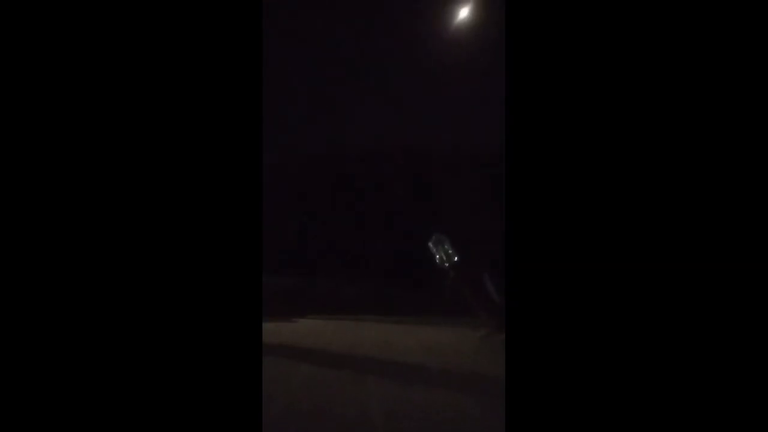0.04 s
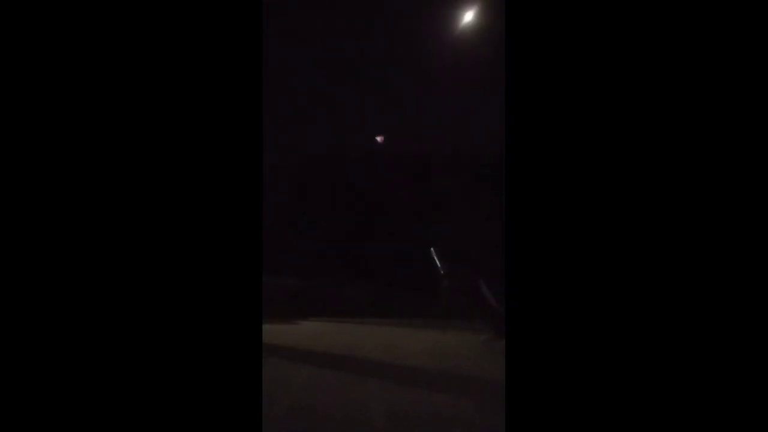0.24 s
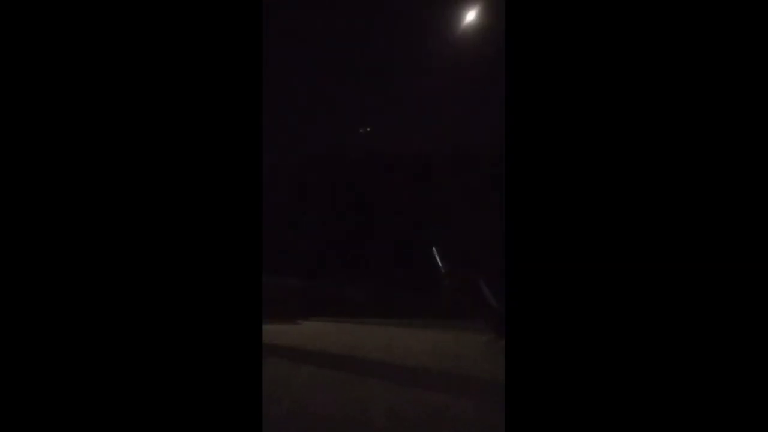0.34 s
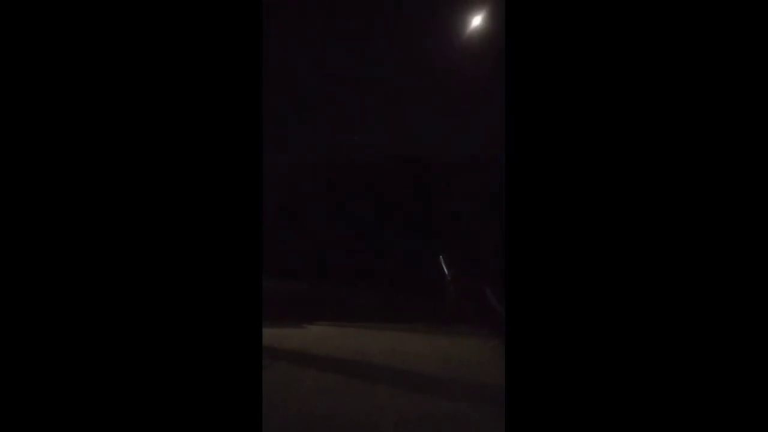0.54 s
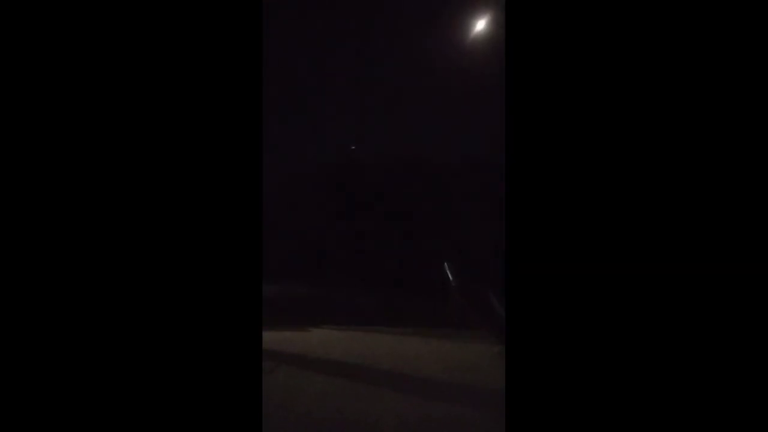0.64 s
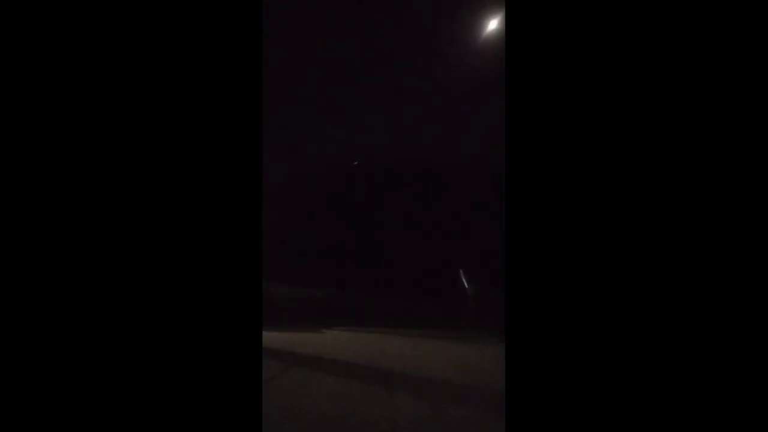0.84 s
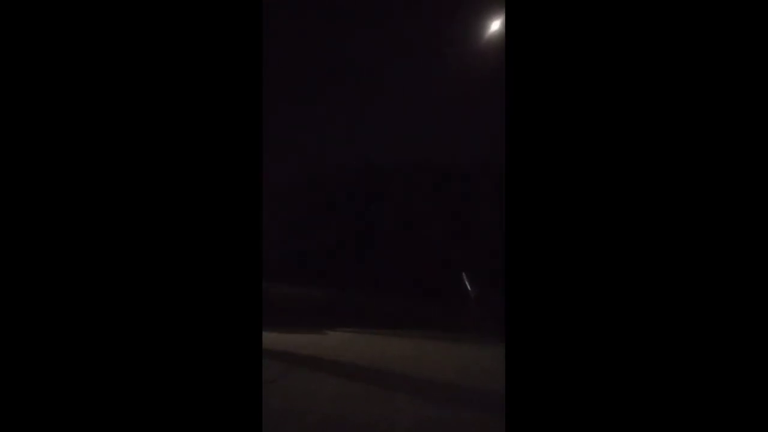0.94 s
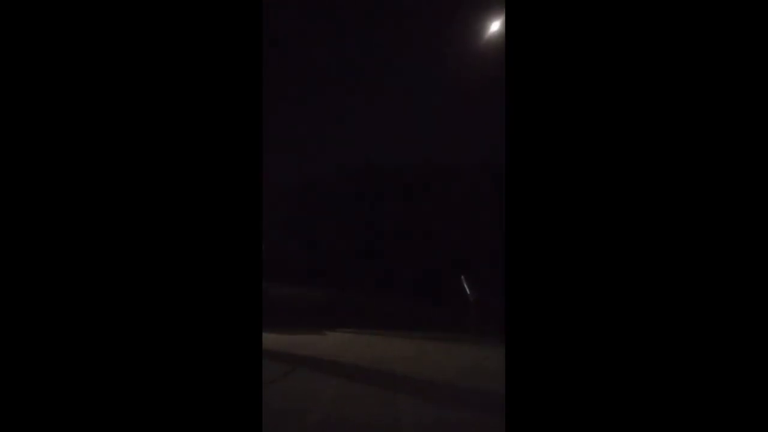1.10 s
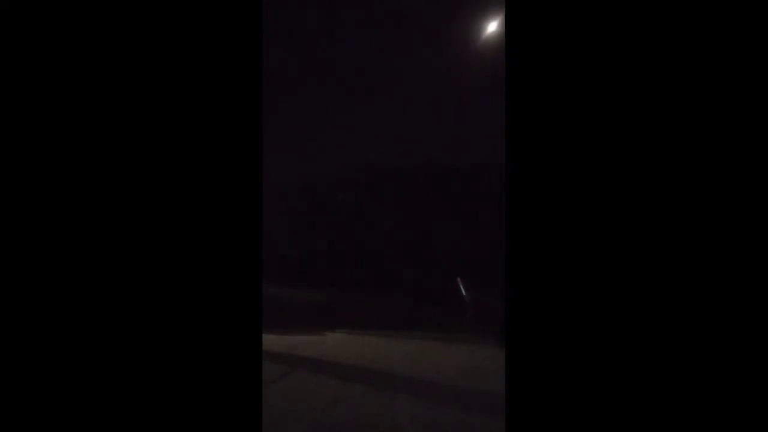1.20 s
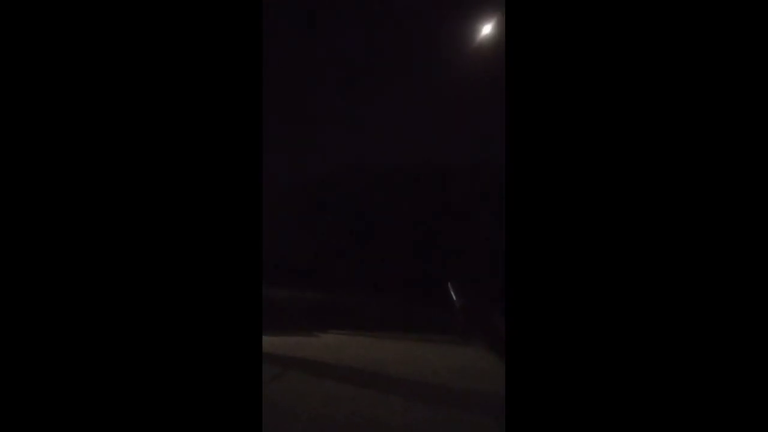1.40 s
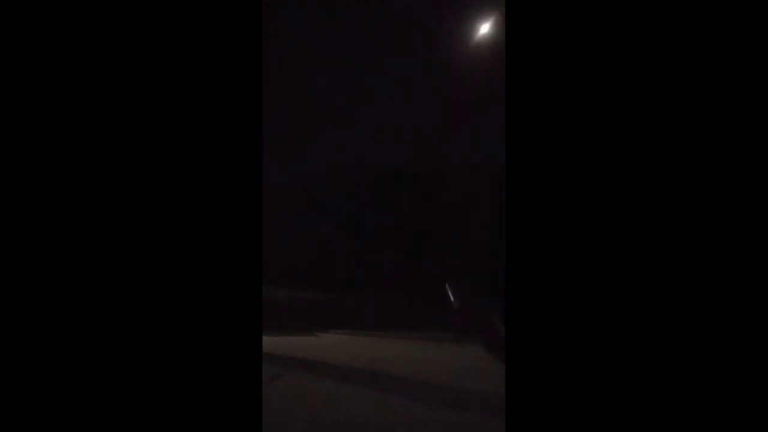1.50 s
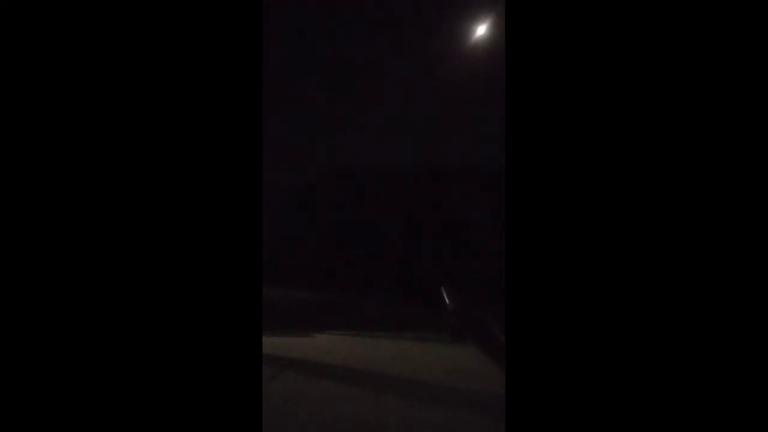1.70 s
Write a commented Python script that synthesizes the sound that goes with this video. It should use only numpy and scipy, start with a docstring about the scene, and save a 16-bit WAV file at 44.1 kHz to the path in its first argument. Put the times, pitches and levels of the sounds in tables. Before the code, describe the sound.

A sharp hollow bang bursts from a plastic bottle outdoors at night, echoing over faint crickets

```python
"""A boom of a few low damped swings overloads the microphone as vapour ignites in a plastic bottle.
A hollow pop of ringing modes and a crack comes first, then a fizz and spurts of filtered noise, the jet.
Smeared noise slaps with a body tone come back from the yard; a banded noise tail rushes away.
Pulsed-tone crickets trill through the night, a bush cricket ticks in falling whistles,
and coloured noise makes the far chorus, the faint hiss and the low rumble."""
import sys
import numpy as np
from scipy import signal
from scipy.fft import rfft, irfft
from scipy.io import wavfile

SR = 44100
rng = np.random.default_rng(int(sys.argv[2]) if len(sys.argv) > 2 else 0)


def dump(signal):
    """Clip the signal to [-1, 1] and save it as 16-bit WAV at the path in sys.argv[1]."""
    limited = np.clip(np.atleast_2d(signal).T, -1, 1)
    pcm = np.round(limited * 32767).astype(np.int16)
    wavfile.write(sys.argv[1], SR, pcm)


N = 77175
T = np.arange(N) / SR
POP_S, BANG_S = 0.2336, 0.279


def from_db(db):
    """Decibels to gain."""
    return 10 ** (np.asarray(db) / 20)


def rms_one(x):
    """Scale to unit rms."""
    return x / np.sqrt(np.mean(x ** 2) + 1e-20)


def at_hz(points, hz):
    """Read a table on a log-frequency axis."""
    table_hz, values = np.transpose(points)
    return np.interp(np.log(np.maximum(hz, 1)), np.log(table_hz), values)


def noise(spectrum):
    """Gaussian noise of a given colour, unit rms."""
    gain = from_db(at_hz(spectrum, np.fft.rfftfreq(N, 1 / SR)))
    return rms_one(irfft(rfft(rng.standard_normal(N)) * gain, N))


def drift(rate_hz):
    """Random wander of unit rms: two-pole low-passed noise, made at SR / 40 and interpolated."""
    step = 40
    pole = np.exp(-2 * np.pi * rate_hz * step / SR)
    white = rng.standard_normal(N // step + 2002)
    slow = signal.lfilter([1], [1, -2 * pole, pole * pole], white)[2000:]   # drop the settling
    return np.interp(np.arange(N) / step, np.arange(len(slow)), rms_one(slow))


def burst(start_s, rise_s, t60_s, hold_s=0):
    """Envelope: sine-squared attack, hold, exponential decay."""
    t = np.maximum(T - start_s, 0)
    attack = np.sin(np.pi / 2 * np.minimum(t / rise_s, 1)) ** 2
    decay = np.exp(-np.log(1000) * np.maximum(t - rise_s - hold_s, 0) / t60_s)
    return attack * decay


def band(x, low_hz, high_hz, order=1):
    """Causal Butterworth band-pass."""
    edges_hz = [low_hz, min(high_hz, SR / 2 - 100)]
    sos = signal.butter(order, edges_hz, "band", fs=SR, output="sos")
    return signal.sosfilt(sos, x + 1e-18)


def night_air():
    """Steady coloured-noise hiss, plus a low noise rumble that comes and goes."""
    # Each row: frequency in Hz, relative density in dB per Hz.
    hiss_spectrum = [(25, -28), (60, -13.5), (110, -7), (180, -12.5), (330, -17), (760, -22.5), (1500, -30),
                     (4200, -38), (9000, -42), (16000, -50)]
    rumble_spectrum = [(20, -44), (45, -15), (70, 1.5), (120, -1.5), (200, -18.5), (600, -54)]
    # Each row: time in seconds, rumble level in dB.
    rumble_level = [(0, -67.5), (.09, -63.5), (.15, -76.5), (.75, -81.5), (.82, -68.5), (.97, -77),
                    (1.04, -67.5), (1.12, -77), (1.22, -71.5), (1.3, -69.5), (1.42, -82), (1.51, -79),
                    (1.57, -67), (1.68, -77.5), (1.75, -72)]
    hiss_db = -77
    rumble_db = np.interp(T, *np.transpose(rumble_level))
    return from_db(hiss_db) * noise(hiss_spectrum) + from_db(rumble_db) * noise(rumble_spectrum)


def crickets():
    """Near-pure wing tones, pulsed by the strokes and wavering, over a noise chorus of far insects."""
    # Each row: mean tone in Hz, level in dB before the swell, mean pulses per second.
    singers = [(5392, -73.5, 43), (5445, -79.5, 49), (5350, -79.5, 37)]
    # Trill swell, early then late. Each row: time in seconds, level in dB (the mean is removed below).
    swell_early = [(0, -72), (.05, -72), (.16, -76.5), (.22, -67.5), (.27, -77.5), (.72, -79)]
    swell_late = [(0.76, -77.5), (0.896, -72), (0.954, -75.5), (0.976, -73), (1.078, -72.5), (1.18, -79),
                  (1.332, -76.5), (1.416, -75), (1.448, -70.5), (1.576, -72.5), (1.592, -79.5), (1.75, -70)]
    # Each row: frequency in Hz, relative density in dB per Hz.
    chorus_spectrum = [(4000, -43.5), (4950, -26), (5200, -4.5), (5400, 4), (5600, -8.5), (5950, -13.5),
                       (6500, 0.5), (7200, -1), (8000, -8.5), (8700, -19.5), (10000, -26), (16000, -52.5)]
    chorus_db, chorus_drift_db = -75.5, 0.61
    swell_s, swell_db = np.transpose(list(swell_early) + list(swell_late))
    swell = from_db(np.interp(T, swell_s, swell_db - swell_db.mean()))
    trill = 0
    for hz, level_db, pulses_per_s in singers:
        strokes = np.cumsum(pulses_per_s * (1 + 0.13 * drift(4))) / SR
        pulse = 1 + 0.68 * np.sin(2 * np.pi * strokes)
        tone = np.sin(2 * np.pi * np.cumsum(hz + 25 * drift(60)) / SR)
        trill = trill + from_db(level_db + 2 * drift(13)) * rms_one(pulse * tone)
    chorus = from_db(chorus_db + chorus_drift_db * drift(15)) * noise(chorus_spectrum)
    return swell * trill + chorus


def bush_cricket():
    """Each wing stroke is a short, slightly rough falling whistle; fainter ones answer at random."""
    # Each row: start in seconds, peak level in dB, starting pitch in Hz before the waver.
    near_ticks = [(1.010, -74, 8200), (1.100, -74, 8300), (1.188, -71, 8200), (1.270, -74, 8300),
                  (1.356, -68, 7300), (1.395, -63, 7300), (1.437, -65, 7300), (1.472, -74, 8400),
                  (1.568, -72, 8200), (1.603, -72, 7700), (1.648, -74, 8400)]
    tick_s, fall_hz, waver_hz = 0.0171, 992.6, 120
    far_per_s, far_db = 40, -77
    far_ticks = [(u * N / SR, far_db, 7200 + 1200 * v)
                 for u, v in rng.random((int(far_per_s * N / SR), 2))]
    out = np.zeros(N + SR)   # room for ticks that overrun the end
    waver = np.pad(waver_hz * drift(199.6), (0, SR))
    progress = np.linspace(0, 1, int(tick_s * SR))
    for start_s, db, hz in list(near_ticks) + far_ticks:
        first = int(start_s * SR)
        span = slice(first, first + len(progress))
        turns = np.cumsum(hz - fall_hz * progress + waver[span]) / SR
        out[span] += from_db(db) * np.sin(np.pi * progress) * np.sin(2 * np.pi * turns)
    return out[:N]


def tail():
    """Weak scatter from the ground nearby, then a fluttering rush from the trees, dying band by band."""
    # Each row: frequency in Hz, relative density in dB per Hz.
    tail_spectrum = [(40, -24.5), (90, -9.5), (215, -2.5), (400, 0), (520, -7.5), (640, -0.5), (880, -12.5),
                     (1430, -12.5), (1900, -10.5), (2300, -19), (2750, -9), (3800, -16), (6400, -18),
                     (8500, -25.5), (11000, -38.5), (16000, -45)]
    # Each row: frequency in Hz, t60 in seconds.
    t60_table = [(80, 0.92), (250, 0.86), (650, 1), (1500, 1.0), (3500, 1), (6500, 0.92), (12000, 0.58)]
    level_db, flutter_db = -40.5, 1.8
    near_rel_db, near_tilt_db_per_octave, near_rise_s, near_t60_s = -7.5, -0.5, 0.091, 0.16
    far_full_s, far_rise_s = 0.4004, 0.017
    path_gain, path_spread_s = 0.33, 0.021   # four extra paths comb the colour
    freqs_hz = np.fft.rfftfreq(N, 1 / SR)
    paths = sum(np.exp(-2j * np.pi * freqs_hz * lag_s) for lag_s in path_spread_s * rng.random(size=4))
    combed = rfft(noise(tail_spectrum)) * (1 + path_gain * paths)
    combed = combed / np.sqrt(1 + (2 * path_gain) ** 2)   # keep the expected power
    octave = np.log2(np.maximum(freqs_hz, 1))
    out = 0
    for hz in 2.0 ** np.arange(5, 15):   # overlapping triangular octave bands
        part = irfft(combed * np.maximum(1 - abs(octave - np.log2(hz)), 0), N)
        near_db = near_rel_db + near_tilt_db_per_octave * np.log2(hz / 1000)
        near = from_db(near_db) * burst(BANG_S, near_rise_s, near_t60_s)
        far = burst(far_full_s - far_rise_s, far_rise_s, at_hz(t60_table, hz))
        out = out + part * np.hypot(near, far)
    return from_db(level_db + flutter_db * drift(90)) * out


def echoes():
    """Each surface returns the bang as a smeared noise slap with a wavering body resonance of its own."""
    # Each row: arrival in seconds, level in dB, rise in s, hold in s, t60 in s, body tone in Hz,
    # body level in dB relative to the echo, slap high cut in Hz.
    reflections = [(0.311, -26, 0.0076, 0.00096, 0.021, 271.8, -3, 7700),
                   (0.379, -40.5, .004, 0.0042, 0.034, 210.4, 8.5, 1590),
                   (0.3898, -31, 0.0057, 0.01, 0.024, 648, -0.5, 6950),
                   (.430, -52, .012, 0.0081, 0.031, 647, 1, 7000),
                   (0.476, -47, 0.0026, 0.0012, 0.018, 1450, 9, 2500),
                   (0.479, -45, .003, 0.0049, 0.058, 523, 5, 1500),
                   (0.575, -49.5, 0.0048, 0.0047, 0.058, 170.6, 8, 400),
                   (.5835, -47, .002, .001, .018, 275.8, 0, 12000),
                   (.596, -55.5, .005, .012, 0.11, 666, -1, 6000),
                   (.68, -61.5, 0.013, .10, .42, 620, -4.5, 5000),
                   (0.869, -78, .015, 0.0096, 0.039, 615, 17, 3100),
                   (1.003, -80, .03, 0.095, .4, 327.5, 5, 1486),
                   (1.107, -96.5, .04, 0.16, .4, 1420, 8, 1500)]
    # Each row: frequency in Hz, relative density in dB per Hz.
    slap_spectrum = [(30, -26), (70, -6), (200, 3), (600, 0.5), (950, -6), (1400, -2.5), (2000, -1),
                     (3500, -7.5), (5500, -10), (7500, -16), (10000, -31.5), (16000, -35.5)]
    body_wander_octaves, body_flutter = 0.077, 0.44   # both rms
    out, slap = np.zeros(N), noise(slap_spectrum)
    for start_s, db, rise_s, hold_s, t60_s, body_hz, body_db, high_hz in reflections:
        turns = np.cumsum(body_hz * 2 ** (body_wander_octaves * drift(150))) / SR
        body = np.sin(2 * np.pi * turns) * (1 + body_flutter * drift(120))
        mix = band(slap, 44, high_hz) + from_db(body_db) * body
        out += from_db(db) * burst(start_s, rise_s, t60_s, hold_s) * mix
    return out


def flame():
    """The flame fizzes through the bottle as a brief noise burst from the pop on."""
    # Each row: frequency in Hz, relative density in dB per Hz.
    fizz_spectrum = [(100, -25), (400, -6), (1500, 3), (3000, 0.5), (6500, -11.5), (9000, -23),
                     (16000, -31.5)]
    level_db, rise_s, hold_s, t60_s = -49.5, 0.0099, 0.044, 0.025
    return from_db(level_db) * noise(fizz_spectrum) * burst(POP_S, rise_s, t60_s, hold_s)


def pop():
    """A crack sets the bottle's air ringing; the pitch climbs and turns ragged as the gas heats."""
    # Air modes. Each row: starting frequency in Hz, relative level in dB, t60 in seconds.
    modes = [(600, -11.5, .011), (989, -4.5, 0.03978), (1920, -2, 0.015), (2680, -21, .018),
             (4120, -23, .014), (6430, -30, 0.032)]
    # Each row: frequency in Hz, relative density in dB per Hz.
    crack_spectrum = [(100, -31), (300, -13), (700, 1), (2200, 0), (4200, -14.5), (6500, -20),
                      (10500, -27.5), (16000, -36.5)]
    ring_db, rise_per_s2, rough_per_s = -7, 1200, 40
    crack_db, crack_t60_s = -17.5, 0.022
    t = np.clip(T - POP_S, 0, None)
    heat = np.minimum(rise_per_s2 * t ** 2, 0.7)   # fractional pitch rise
    stretched_s = np.cumsum((t > 0) * (1 + heat)) / SR
    ring = 0
    for hz, db, t60_s in modes:
        ring = ring + from_db(db) * burst(POP_S, 0.00033, t60_s) * np.sin(2 * np.pi * hz * stretched_s)
    ring = ring * (1 + np.minimum(rough_per_s * t, 1) * drift(430))
    crack = from_db(crack_db) * burst(POP_S, 0.0002, crack_t60_s) * noise(crack_spectrum)
    return band(from_db(ring_db) * ring + crack, 290, 18000, order=2)


def jet():
    """Hot gas tears out of the neck in quick spurts: one noise, each spurt with its own high cut."""
    # Each row: time of full level in seconds, level in dB, rise in s, hold in s, t60 in s, high cut in Hz.
    spurts = [(0.2731, -14, .002, 0.0028, 0.022, 2211), (0.2764, -13, .003, 0.0044, 0.015, 17000),
              (0.2866, -19.5, .002, 0.0012, 0.0067, 14000), (.2920, -32, .002, 0.00071, 0.025, 8106)]
    # Each row: frequency in Hz, relative density in dB per Hz.
    gas_spectrum = [(60, -13.5), (300, 3.5), (750, 3.5), (1100, -5.5), (1420, 1), (2600, -5), (3250, -2.5),
                    (4100, -7.5), (6100, -6), (7900, -19), (12500, -16.5), (15500, -20)]
    gas = noise(gas_spectrum)
    out = 0
    for full_s, db, rise_s, hold_s, t60_s, high_hz in spurts:
        envelope = burst(full_s - rise_s, rise_s, t60_s, hold_s)
        out = out + from_db(db) * envelope * band(gas, 40, high_hz)
    return out


def boom():
    """The escaping gas drives a few low swings of the bottle's air that stop short and leave a faint ring."""
    # Each row: start in seconds, frequency in Hz, relative level in dB, rise in s, hold in s, t60 in s.
    swing_table = [(.2795, 105, -6, .004, 0.0028, 0.028), (.2782, 295, -3, 0.0034, 0.0046, .026),
                   (.2780, 468, -9, 0.006, 0.0031, 0.029), (.2778, 590, -2, .002, 0.0043, 0.024)]
    # Each row: frequency in Hz, level in dB, t60 in seconds.
    ring_table = [(241.1, -33.5, .22), (440, -27, 0.06)]
    swings_db, ring_rise_s = -5.5, 0.0054
    swings, ring = 0, 0
    for start_s, hz, db, rise_s, hold_s, t60_s in swing_table:
        swing = np.sin(2 * np.pi * hz * (T - start_s))
        swings = swings + from_db(db) * burst(start_s, rise_s, t60_s, hold_s) * swing
    for hz, db, t60_s in ring_table:
        tone = np.sin(2 * np.pi * hz * (T - BANG_S))
        ring = ring + from_db(db) * burst(BANG_S, ring_rise_s, t60_s) * tone
    return from_db(swings_db) * swings + ring


def scene():
    """The bang and its reflections over the night's insects."""
    night = night_air() + crickets() + bush_cricket()
    reflected = tail() + echoes()
    bang = flame() + pop() + jet() + boom()
    return (night + reflected + bang)[None]


def record(dry):
    """The microphone overloads by soft saturation; a steep low-pass cuts the top."""
    overload, stopband_hz = 0.69, 17000   # ceiling re full scale; 70 dB down from here up
    clipped = dry / (1 + (dry / overload) ** 4) ** (1 / 4)
    sos = signal.cheby2(12, 70, stopband_hz, fs=SR, output="sos")
    return signal.sosfilt(sos, clipped)


dry = scene()
out = record(dry)
dump(out)
```